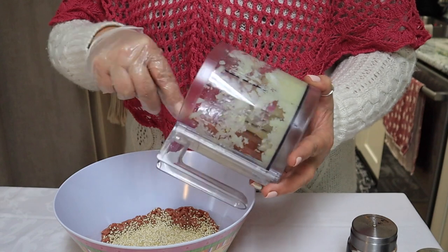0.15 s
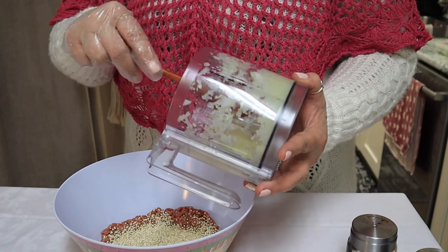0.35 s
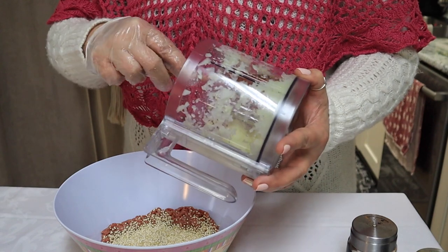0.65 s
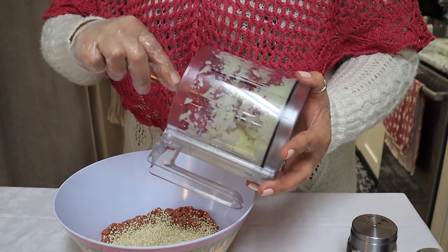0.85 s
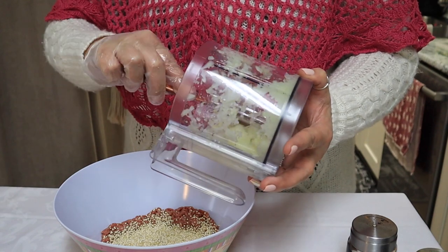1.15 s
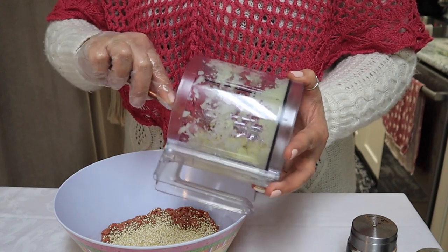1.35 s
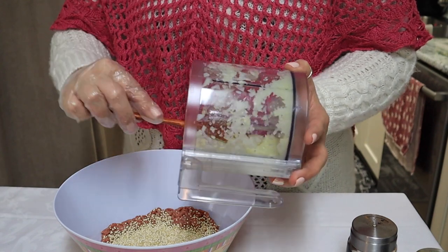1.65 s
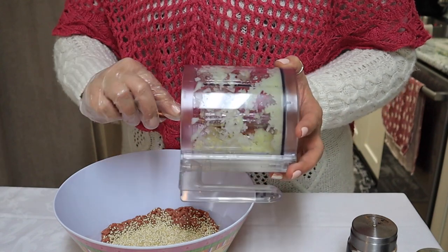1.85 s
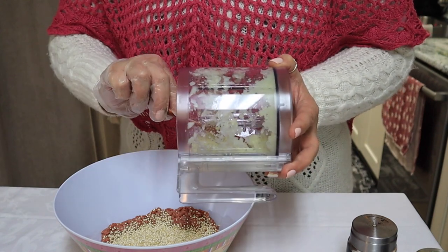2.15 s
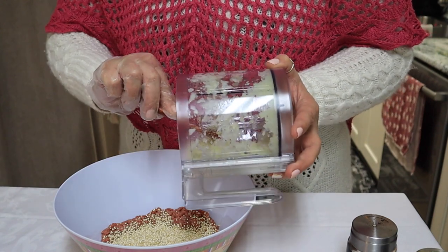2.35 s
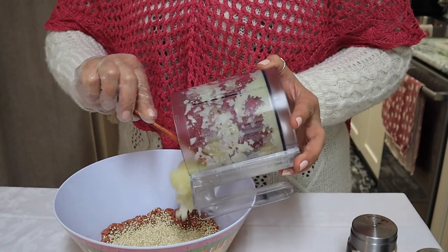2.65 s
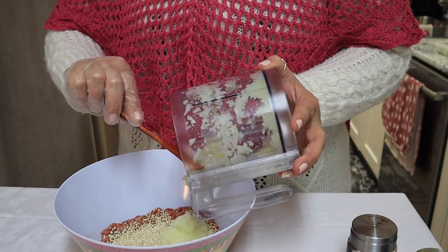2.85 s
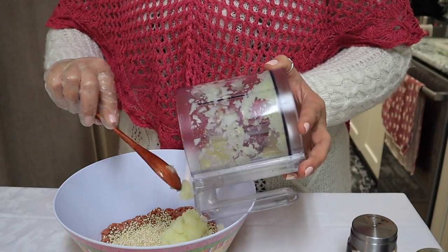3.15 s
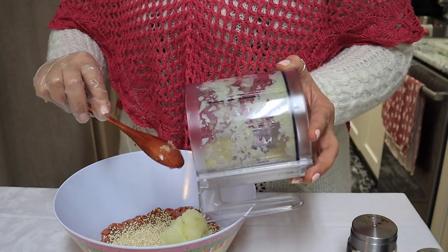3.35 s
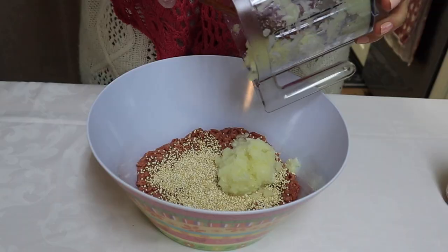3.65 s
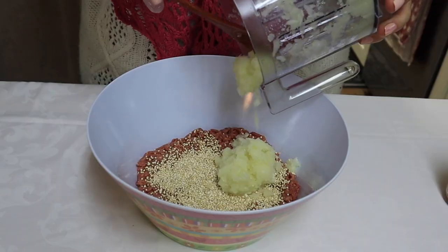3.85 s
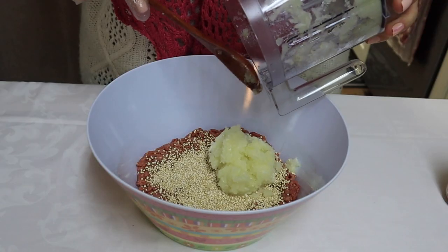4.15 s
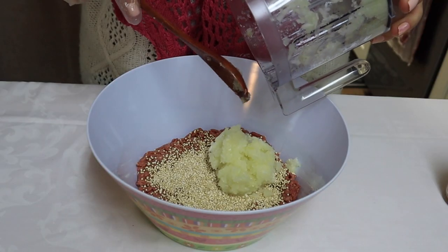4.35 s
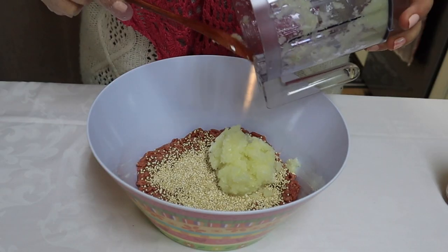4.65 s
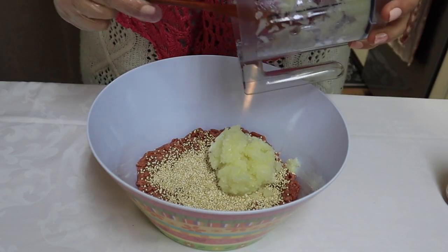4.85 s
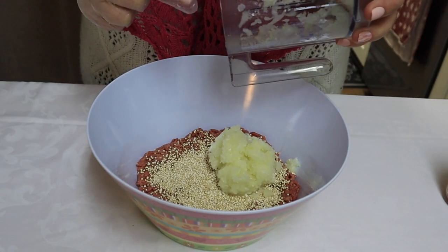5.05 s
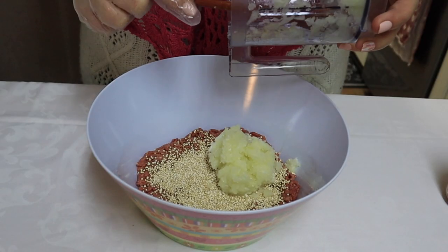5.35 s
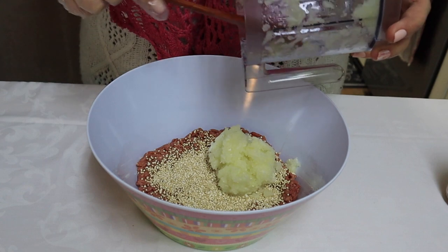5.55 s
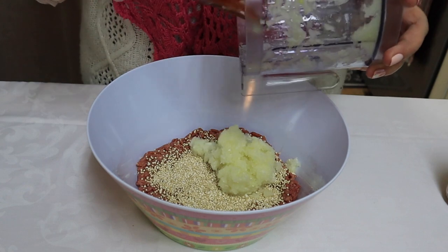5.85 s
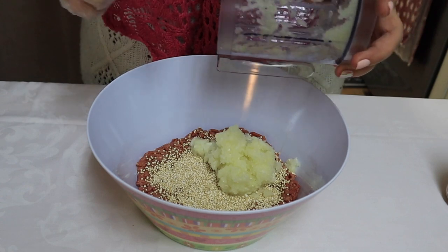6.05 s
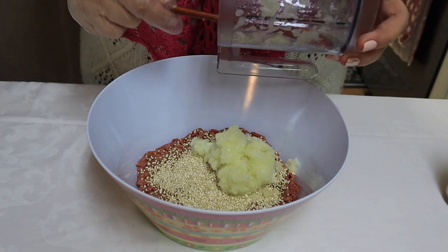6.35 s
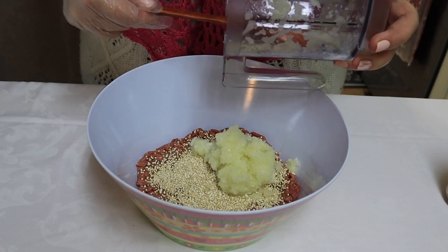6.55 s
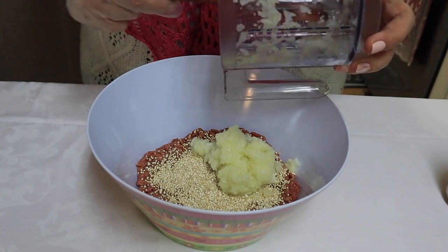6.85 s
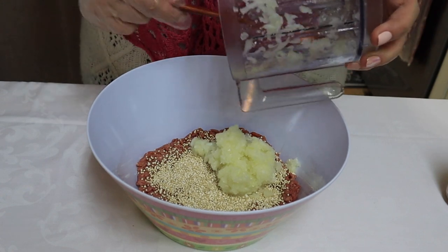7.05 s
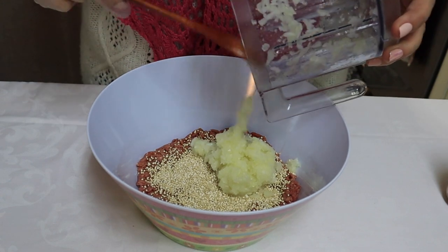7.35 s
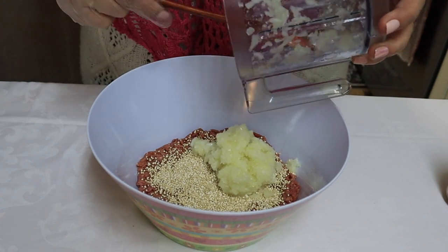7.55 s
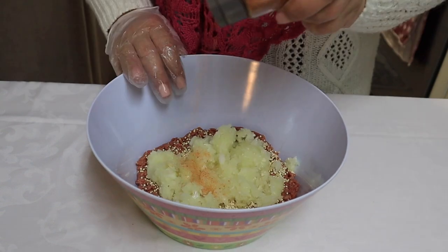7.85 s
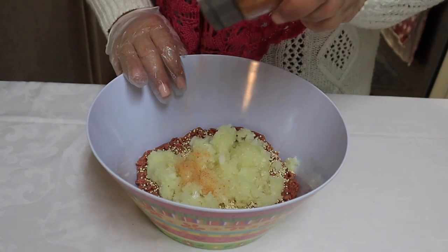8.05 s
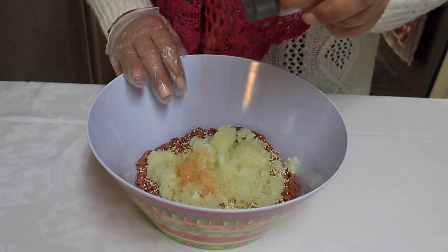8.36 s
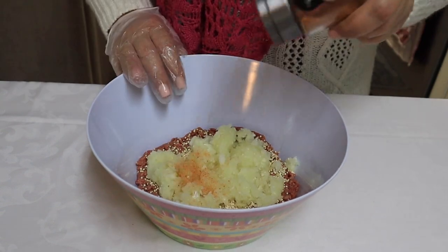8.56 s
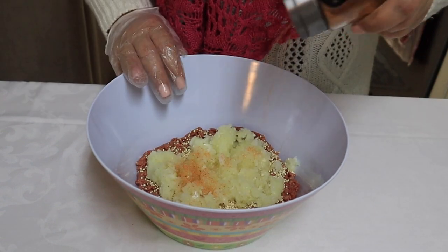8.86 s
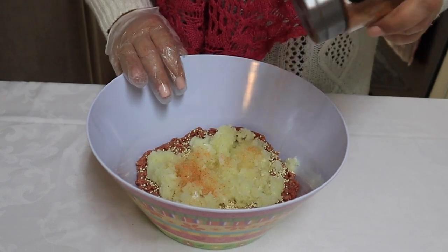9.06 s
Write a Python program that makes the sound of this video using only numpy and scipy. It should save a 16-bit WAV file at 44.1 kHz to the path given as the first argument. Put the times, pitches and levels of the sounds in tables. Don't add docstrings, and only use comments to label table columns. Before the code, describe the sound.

A small kitchen with low appliance rumble and a thin, steady high whine that drops suddenly at about 3.7 s. Very close, a wooden spoon works inside a hard plastic cup. A soft scrape and bump come at 0.2 s, light taps near 0.5, sharp lip knocks at 0.9 and 1.1, a firm hollow knock at 1.5 and a double tap at 1.8. Hollow drags follow at 2.2-2.6. From 3 to 4.9 it is sparse, with tiny wet pulp crackles around 4.1. Rapid slaps and a rattle hit at 5.0, then squelches, a strong slap at 6.0, bright double taps at 6.15 and 6.3, and sticky snaps at 6.4-6.7. The loudest hollow knocks fall at 6.9, 7.5 and 7.6, with a last pair near 7.8. Six soft, hissing spice shakes run from 8.0 to 8.9, then a faint bump at 9.1. Short room echo, wide stereo.

```python
import sys
import numpy as np
from scipy import signal
from scipy.fft import rfft, irfft, next_fast_len
from scipy.io import wavfile
from scipy.ndimage import uniform_filter1d

SR = 44100
rng = np.random.default_rng(int(sys.argv[2]) if len(sys.argv) > 2 else 0)


def inscribe(sig):
    pcm = np.round(np.clip(np.atleast_2d(sig).T, -1, 1) * 32767)
    wavfile.write(sys.argv[1], SR, pcm.astype(np.int16))


def rack_gain(trim_db):
    fader = np.asarray(trim_db, float)
    return 10 ** (fader / 20)


N = 405719
T = np.arange(N) / SR

# [f/Hz, level/dB, t60/s]
HOLLOW = [(505.6, -2.5, 0.16), (550.8, 4, 0.079), (600, 1, 0.12), (633, 3, 0.07), (709.4, 4, 0.095)]
# [f/Hz, level/dB, t60/s]
WALL = [(1456, 3, 0.024), (1584, -2, 0.031), (1748, -1.5, 0.089), (1870, 9.5, 0.017), (2080, 11, 0.023),
        (2110, 10.5, 0.023), (2300, 16.5, 0.0079), (2274, -4, 0.079)]
# [f/Hz, level/dB, t60/s]
RIM = [(881, 0.5, 0.048), (948, 1.5, 0.036), (1097, -1, 0.055), (1150, -9.5, 0.08), (1279, 4.5, 0.034),
       (1403, -2, 0.05)]
# [f/Hz, level/dB]
WET = [(880, -45), (1500, -6), (1780, -9.5), (3310, -5.5), (8570, -8.5), (10600, -1.5), (12500, -28),
       (16000, -60.5)]


def colour(x, shape):
    size = next_fast_len(x.shape[-1])
    hz = np.maximum(np.arange(size // 2 + 1) * SR / size, 1)
    points = np.array(shape, float)
    gain_db = np.interp(np.log(hz), np.log(points[:, 0]), points[:, 1])
    return irfft(rfft(x, size) * rack_gain(gain_db), size)[..., :x.shape[-1]]


def unit(x):
    return x / np.sqrt(np.mean(x ** 2))


def fade(t, t60):
    return np.exp(-np.log(1000) * t / t60)


def ring(modes, tweak_db, detune, seconds=0.15, rise_cycles=0.14):
    hz, db, t60 = np.transpose(modes)[:, :, None]
    t = T[:int(seconds * SR)]
    swell = (1 - np.exp(-t * hz / rise_cycles)) ** 2
    sense = (-1.) ** np.arange(len(modes))[:, None]
    level = sense * rack_gain(db + tweak_db[:, None])
    tone = np.sin(2 * np.pi * hz * detune[:, None] * t)
    y = np.sum(level * swell * fade(t, t60) * tone, axis=0)
    return y / np.abs(y).max()


def add(out, s, y):
    i = int(s * SR)
    out[i:i + len(y)] += y[:N - i]


def grit(rate, scatter_db):
    struck = rng.random(N) < rate / SR
    sign = rng.choice([-1, 1], N)
    size_db = scatter_db * np.minimum(rng.exponential(size=N), 4.5)
    return unit(struck * sign * rack_gain(size_db))


def stroke(layer, start, peak, end, db):
    edge_db = 24
    i = max(int((3 * start - 2 * peak) * SR), 0)
    j = min(int((3 * end - 2 * peak) * SR), N)
    away = np.maximum((peak - T[i:j]) / (peak - start), (T[i:j] - peak) / (end - peak))
    return (i + .5) / SR, rack_gain(db - edge_db * away) * layer[i:j]


def rumble():
    # [f/Hz, level/dB]
    hum = [(12, -31), (20, 1), (72, -3.5), (204, -12), (1260, -23), (4670, -35), (7520, -35),
           (12400, -43.5)]
    # [f/Hz, side minus middle level/dB]
    hum_side = [(30, -35), (60, -13), (110, -6.5), (200, 0.5), (380, 3), (1290, 5.5), (8120, 7),
                (15000, 5.5)]
    mid, side = rack_gain(-60) * unit(colour(rng.standard_normal((2, N)), hum))
    side = colour(side, hum_side)
    return np.array([mid + side, mid - side])


def whine():
    # [t/s, level/dB]
    whine_level = [
        (0, -65.5),
        (3.65, -66),
        (3.67, -73.5),
        (9.2, -74),
    ]
    t, db = np.array(whine_level, float).T
    level_db = np.interp(T, t, db, left=-120, right=-120)
    phase = np.array([[.9], [-.9]])
    return np.sqrt(2) * rack_gain(level_db) * np.sin(2 * np.pi * 6285 * T + phase)


def glove(db=-78, sway_db=5):
    step = SR // 14
    sway = uniform_filter1d(np.repeat(rng.standard_normal(N // step + 1), step), step)[:N]
    return rack_gain(db + sway_db * sway) * unit(colour(grit(4000, 2.5), WET))


def scrapes():
    # [start t/s, peak t/s, end t/s, hollow level/dB, wall level/dB]
    drags = [
        (0.148, 0.168, 0.44, -55.5, -64),
        (0.76, 0.846, 0.86, -57, -68),
        (2.15, 2.246, 2.32, -58.5, -61.5),
        (2.42, 2.475, 2.6, -53, -68),
        (2.44, 2.56, 2.63, -45, -60),
        (2.8, 2.84, 2.95, -72, -63),
        (4.9, 5.22, 5.8, -78, -68),
        (5.0, 5.46, 5.54, -81, -69.5),
        (6.36, 6.4, 6.9, -72, -70),
        (6.76, 6.85, 6.87, -71, -84),
    ]
    # [start t/s, peak t/s, end t/s, hollow level/dB, wall level/dB]
    smears = [
        (5.56, 5.58, 5.71, -80, -76),
        (6.52, 6.608, 6.7, -68, -66.5),
    ]
    # [start t/s, peak t/s, end t/s, hollow level/dB, wall level/dB]
    rattles = [
        (4.975, 4.98, 5.095, -43.5, -47.5),
        (4.93, 5.075, 5.1, -55, -55),
    ]
    # [start t/s, peak t/s, end t/s, hollow level/dB, wall level/dB]
    judders = [
        (5.978, 5.995, 6.066, -39.5, -37.5),
    ]

    def driven(modes, tweak_db):
        return unit(signal.fftconvolve(drag, ring(modes, tweak_db, np.ones(len(modes))))[:N])

    drag = grit(1500, 1.1)
    wet = unit(colour(grit(6000, 1.64), WET))
    # (f/Hz, level/dB, t60/s)
    rubbed = [(1300, 1, 0.013), (1750, 0.0, 0.028), (1995, 3, 0.031), (2046, -3.5, 0.049),
              (2300, -7, 0.027), (2820, -5, 0.026), (4620, -7, 0.037)]
    hollow = driven(HOLLOW, np.array([7.5, 2.9, 6.7, 2.0, 2.8]))
    gentle = driven(rubbed, np.zeros(len(rubbed)))
    hard = driven(RIM + WALL, np.zeros(len(RIM + WALL)))
    ribs = np.abs(signal.fftconvolve(grit(500, 3.2), fade(T[:SR // 30], 0.05))[:N])
    hard = unit(hard * ribs)
    kinds = [(drags, gentle + rack_gain(-5.0) * wet),
             (smears, gentle + rack_gain(10) * wet),
             (rattles, rack_gain(-8) * hard + gentle + rack_gain(-5) * wet),
             (judders, hard + rack_gain(-7) * wet)]
    out = np.zeros(N)
    for table, wall in kinds:
        for start, peak, end, hollow_db, wall_db in table:
            add(out, *stroke(hollow, start, peak, end, hollow_db))
            add(out, *stroke(wall, start, peak, end, wall_db))
    return out


def crackles():
    # [t/s, bright level/dB, dull level/dB]
    pops = [(0.408, -46, -54), (2.1812, -51, -51), (2.63, -52, -56), (2.6803, -46, -54), (3.3079, -49, -78),
            (3.6731, -40.5, -52), (3.682, -42, -72), (4.017, -44, -61), (4.024, -41, -54),
            (4.0337, -39.5, -75), (4.048, -48, -54), (4.1011, -47, -79), (4.13, -36.5, -68),
            (4.2607, -52, -80), (5.3499, -34.5, -43.5), (5.5835, -36.5, -47.5), (5.6397, -48, -55),
            (5.8467, -38, -71), (5.915, -44, -55), (6.551, -36, -49), (6.569, -47, -52), (6.5798, -36, -48),
            (6.5879, -35, -62.5), (6.606, -33, -48), (6.6278, -33, -56.5), (6.6327, -30, -48),
            (7.4222, -47, -63), (7.445, -46, -54), (7.7354, -34.5, -53), (8.2768, -52, -58)]
    # [t/s, bright level/dB, dull level/dB, length/ms]
    squelches = [(0.159, -53, -53, 11), (0.196, -40.5, -48, 17), (2.1994, -75, -61, 46),
                 (2.828, -43.5, -53, 39), (2.8953, -48, -84, 18), (3.1073, -56, -85, 18),
                 (4.0346, -46, -56.5, 13), (4.134, -65, -60, 37), (5.0855, -38.5, -50, 22),
                 (5.371, -41, -50, 25), (5.47, -42.5, -51, 37), (5.7475, -44, -41, 18),
                 (5.885, -43.5, -59, 12), (6, -39, -41.5, 31), (6.327, -41, -53, 20), (6.373, -35, -52, 12),
                 (6.3891, -32.5, -40.5, 5.5), (6.6768, -34.5, -53.5, 7.8), (7.0999, -26.5, -46, 6.4),
                 (7.114, -42, -54, 11), (8.7495, -57, -59, 33)]
    out = np.zeros(N)
    clicks = 0.62 * grit(7000, 3.4) + 0.79 * rng.standard_normal(N)
    bright = unit(colour(clicks, [(4000, -30), (6500, 1.0), (10500, 6.0), (13000, -5.0), (16400, -53.0)]))
    dull = unit(colour(clicks, [(1200, 3.5), (2600, 8.0), (5500, 6.5), (8000, -34)]))
    for s, bright_db, dull_db, length_ms in [(*pop, 3.5) for pop in pops] + squelches:
        i = int(s * SR)
        t = T[:int(2.5 * length_ms * SR / 1000)] * 1000 / length_ms
        flurry = rack_gain(bright_db - 13) * bright[i:i + len(t)] + rack_gain(dull_db - 6) * dull[i:i + len(t)]
        add(out, s, flurry * np.minimum(6 * t, 1) * np.exp(-t ** 2))
    return out


def blows(unstruck_db=-70):
    # [t/s, hollow level/dB, wall level/dB, rim level/dB, crack level/dB]
    bumps = [
        (0.1644, -44.5, -73, -50.5, -51.5),
        (0.8325, -47.5, -56, -56, -58.5),
        (1.5197, -32, -27.5, -34, -31.5),
        (2.0019, -42.5, -45.5, -53, -58),
        (7.7677, -39.5, -50, -58, -47),
        (9.1019, -53, -59, -60, -60),
    ]
    # [t/s, wall level/dB, rim level/dB, crack level/dB, crack f/Hz]
    rim_taps = [
        (0.4741, -36, -44.5, -38, 7300),
        (5.7565, -27.5, -36, -33, 5200),
        (6.2814, -38.5, -45, -44, 6130),
        (6.3069, -31, -37, -36.5, 7900),
        (7.2448, -36, -36.5, -42.5, 5030),
        (7.5904, -21, -34, -24, 9500),
        (7.777, -23.5, -38, -28.5, 5300),
    ]
    # [t/s, hollow level/dB, wall level/dB, rim level/dB, crack level/dB]
    slaps = [
        (4.9732, -33.5, -39, -38.5, -46),
        (4.9944, -36, -38, -40, -45),
        (5.0333, -46, -45, -41, -50),
        (5.968, -24, -27, -26, -42),
        (5.985, -59, -40, -39, -53),
        (7.475, -19, -32, -25, -37),
        (7.4879, -26, -42, -28.5, -38),
    ]
    # [t/s, wall level/dB, hollow level/dB, crack level/dB, wall f/Hz]
    wet_taps = [
        (0.5469, -50, -40, -33.5, 1590),
        (5.0892, -48.5, -53, -58, 1990),
        (5.9939, -51, -26.5, -62, 2300),
        (6.8786, -58, -55.5, -45, 2030),
        (6.9403, -23.5, -16, -26, 2190),
        (7.0305, -28, -38.5, -37.5, 1694),
        (7.1104, -44.5, -61, -40, 1850),
    ]
    # [t/s, wall level/dB, rim level/dB, crack level/dB, hollow f/Hz]
    lip_taps = [
        (0.919, -22.5, -36, -27, 500),
        (1.0903, -39, -40, -48, 500),
        (1.0986, -23.5, -40.5, -41.5, 740),
        (3.685, -48.5, -56, -54, 600),
    ]
    # [t/s, wall level/dB, hollow level/dB, crack level/dB, wall f/Hz]
    dry_taps = [
        (1.8245, -35, -49, -46.5, 1580),
        (1.8524, -40, -25.5, -45.5, 1870),
        (1.9375, -57, -59, -49, 1750),
        (3.0059, -58, -71, -54, 2150),
        (3.72, -66, -51.5, -63, 2110),
        (6.1414, -20.5, -28.5, -28, 2204),
        (6.1504, -23, -37, -30, 2125),
    ]
    rows = []
    for s, air, wall, rim, crack in bumps:
        rows.append((s, wall, air, rim, air - 10, crack, 1600, 715, 5700))
    for s, wall, rim, crack, hz in rim_taps:
        rows.append((s, wall, wall - 11, rim, wall - 6.5, crack, 1780, 700, hz))
    for s, air, wall, rim, crack in slaps:
        rows.append((s, wall, air, rim, wall - 19, crack, 1970, 555, 11000))
    for s, wall, air, crack, hz in wet_taps:
        rows.append((s, wall, air, unstruck_db, wall - 4, crack, hz, 548, 10100))
    for s, wall, rim, crack, hz in lip_taps:
        rows.append((s, wall, wall - 18, rim, wall - 14, crack, 1860, hz, 6500))
    for s, wall, air, crack, hz in dry_taps:
        rows.append((s, wall, air, unstruck_db, wall - 8, crack, hz, 560, 5600))
    return sorted(rows)


def contact_crack(db, crack_hz):
    # [f/Hz, level/dB]
    crack_shape = [(2650, -4.5), (4700, -1), (5900, 0), (7000, -0.5), (9480, -2.5), (11800, -2.5),
                   (14000, -26), (16300, -46)]
    t = T[:SR // 20]
    decay = fade(t, 0.0081) + 0.13 * fade(t, 0.035)
    burst = rng.standard_normal(len(t)) * np.minimum(t / 0.00059, 1) * decay
    peak = [(crack_hz / 1.26, -7), (crack_hz, 0), (crack_hz * 1.104, -7)]
    return rack_gain(db + 17.5) * colour(colour(burst, crack_shape), peak)


def knocks():
    # [f/Hz, level/dB, t60/s]
    clack = [(2620, 0, .04), (2770, -3, .02), (2935, -1, .04), (3200, -4, .02), (3460, -4, .025),
             (3750, -6, .02), (4200, -8, .015)]
    out = np.zeros(N)
    families = (WALL, HOLLOW, RIM, clack)
    widths = (0.204, 0.13, 0.15, 0.258)
    struck = blows()
    chance = rng.standard_normal((len(struck), len(families), 3, 8))
    for blow, luck in zip(struck, chance):
        s, wall_db, hollow_db, rim_db, clack_db, crack_db, wall_hz, hollow_hz, crack_hz = blow
        peaks_db = (wall_db, hollow_db, rim_db - 0.5, clack_db)
        spots_hz = (wall_hz, hollow_hz, 1230, 3200)
        for modes, db, spot_hz, width, draws in zip(families, peaks_db, spots_hz, widths, luck):
            size, tune, spread = draws
            near_db = -14 * np.abs(np.log2(np.array(modes)[:, 0] / spot_hz))
            count = len(modes)
            named = ring(modes, near_db + 2.5 * size[:count], 1 + .006 * tune[:count])
            fan = np.linspace(-1, 1, len(spread)) + 0.18 * spread
            damped = [(spot_hz, 0, .025)] * len(spread)
            clatter = ring(damped, 2.0 * size, np.exp(width * fan), seconds=.05)
            add(out, s, rack_gain(db) * named)
            add(out, s, rack_gain(db - 1.5) * clatter)
        add(out, s, contact_crack(crack_db, crack_hz))
    return signal.sosfilt(signal.butter(2, 380, "high", fs=SR, output="sos"), out)


def thuds():
    # [t/s, level/dB, f/Hz, t60/s]
    drops = [(0.541, -36, 200, 0.034), (1.699, -50.5, 233, 0.1), (2.847, -47, 188, 0.091),
             (5.753, -46, 367, 0.081), (6.151, -32.5, 378, 0.065), (7.242, -42, 339, 0.067),
             (7.302, -47.5, 102, 0.15), (6.942, -37.5, 182, 0.025), (7.591, -40, 260, 0.032),
             (7.775, -43.5, 238, 0.057), (9.118, -45.5, 188.6, 0.1)]
    out, t = np.zeros(N), T[:SR // 5]
    for s, db, hz, t60 in drops:
        rise = 1 - np.exp(-t / 0.0019)
        add(out, s, rack_gain(db) * rise * fade(t, t60) * np.sin(2 * np.pi * hz * t))
    return out


def shaker():
    # [t/s, level/dB]
    shakes = [
        (7.974, -70),
        (8.158, -67),
        (8.32, -64.5),
        (8.514, -62),
        (8.68, -63.5),
        (8.866, -63),
    ]
    # [f/Hz, level/dB]
    spice = [(2500, -20), (6000, -9.5), (8500, -5.5), (10300, 4), (12000, -4.5), (15000, -28)]
    rise_s, fall_s, trickle_s = 0.096, 0.04, 1
    out = np.zeros(N)
    grains = unit(colour(grit(9000, 4.3), spice))
    for s, db in shakes:
        add(out, *stroke(grains, s - rise_s, s, s + fall_s, db + 4.0))
    add(out, *stroke(grains, s, s + fall_s, s + trickle_s, -68))
    return out


def later(x, lag):
    size = next_fast_len(N)
    delay = np.exp(-2j * np.pi * lag * np.arange(size // 2 + 1) / size)
    return irfft(rfft(x, size) * delay, size)[:N]


def room(x, wet_db=-6, alike=0.13):
    # [f/Hz, t60/s]
    room_t60 = [(200, 0.44), (600, 0.24), (2000, 0.24), (6000, 0.22), (14000, 0.11)]
    hop = SR // 4
    t, tails, places = T[:hop], 0, 9
    room_hz, room_s = np.array(room_t60).T
    for hz in 125 * 2. ** np.arange(8):
        t60 = np.interp(np.log(hz), np.log(room_hz), room_s)
        edges = [hz / np.sqrt(2), min(hz * np.sqrt(2), .49 * SR)]
        octave = signal.butter(2, edges, "band", fs=SR, output="sos")
        noise = signal.sosfilt(octave, rng.standard_normal((places, 2, len(t))))
        shared = noise + alike * noise[:, ::-1]
        tails = tails + shared * fade(t, t60) * np.minimum(t / 0.0004, 1)
    tails = tails / np.sqrt(np.sum(tails ** 2) / (2 * places))
    padded = np.pad(x, (hop, 3 * hop))
    out = np.zeros((2, N + 8 * hop))
    window = np.sin(np.pi * np.arange(2 * hop) / (2 * hop))
    for k in range(N // hop + 2):
        piece = padded[k * hop:(k + 2) * hop] * window
        echo = signal.fftconvolve(piece[None], tails[k % places], axes=1)
        out[:, k * hop:k * hop + echo.shape[1]] += echo
    return rack_gain(wet_db) * out[:, hop:hop + N]


def widened(left, right):
    # [f/Hz, level/dB]
    widen = [(200, -15), (600, -3), (1300, 0.5), (3000, 7.5), (8000, 8.5), (14000, 7)]
    # [f/Hz, left minus right level/dB]
    lean = [(300, 0), (600, 0), (1300, -0.5), (2400, -2.5), (4400, 2), (8000, 1), (14000, 1.5)]
    mid = (left + right) / 2
    side = colour((left - right) / 2, widen)
    ears = [colour(mid + k * side, [(hz, k * db / 2) for hz, db in lean]) for k in (1, -1)]
    return np.array(ears)


def scene():
    near = glove() + scrapes() + crackles() + knocks() + thuds() + shaker()
    left, right = np.array([near, later(near, 0.47)]) + room(near)
    return widened(left, right) + rumble() + whine()


def low_pass(x):
    return signal.sosfilt(signal.butter(12, 16490, fs=SR, output="sos"), x)


def record(dry):
    return low_pass(dry)


dry = scene()
out = record(dry)
inscribe(out)
```